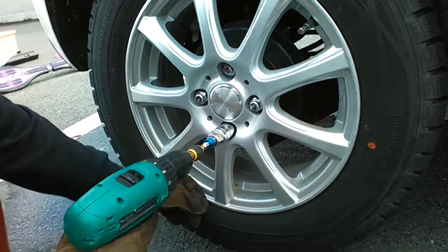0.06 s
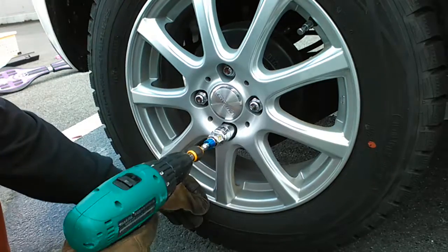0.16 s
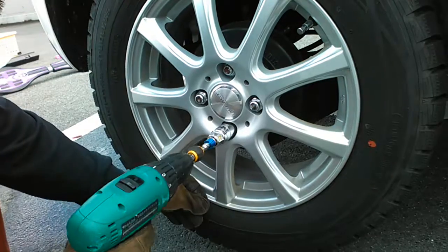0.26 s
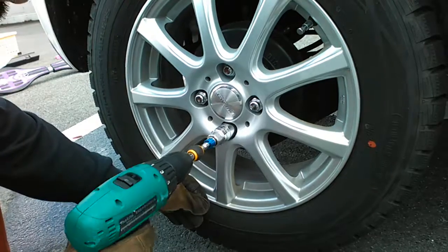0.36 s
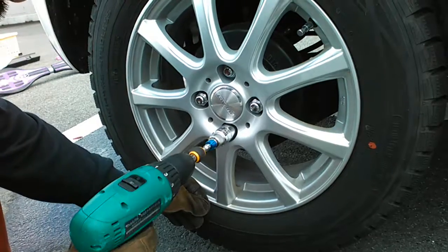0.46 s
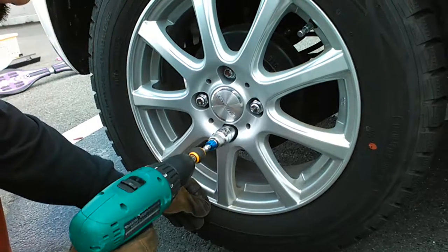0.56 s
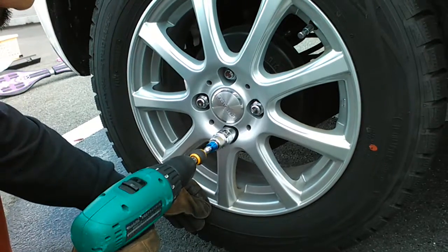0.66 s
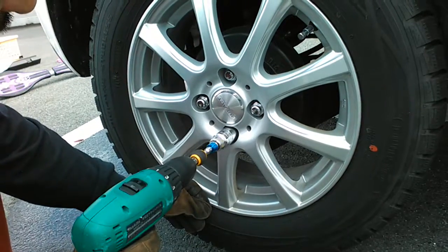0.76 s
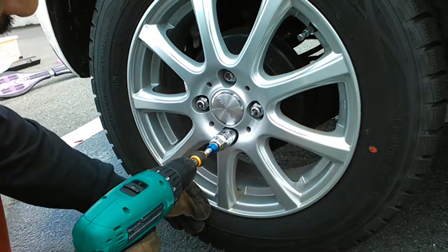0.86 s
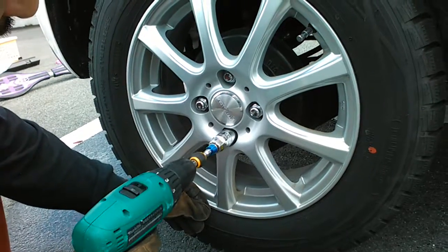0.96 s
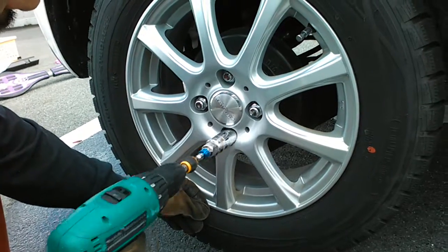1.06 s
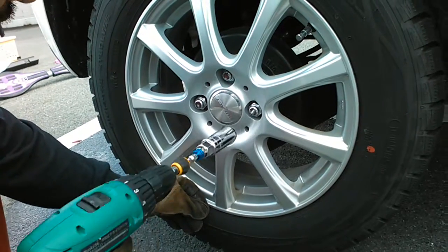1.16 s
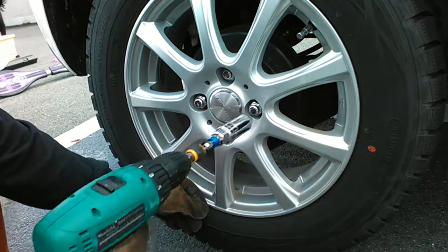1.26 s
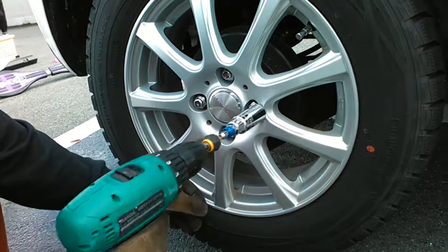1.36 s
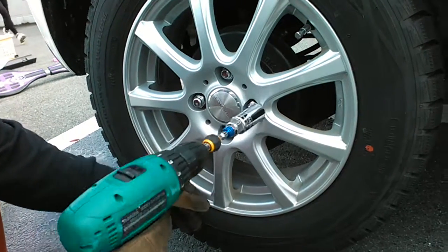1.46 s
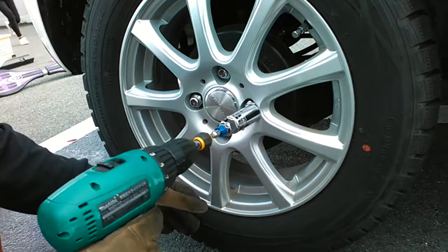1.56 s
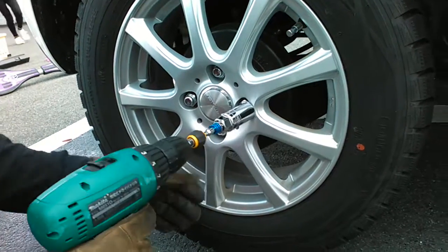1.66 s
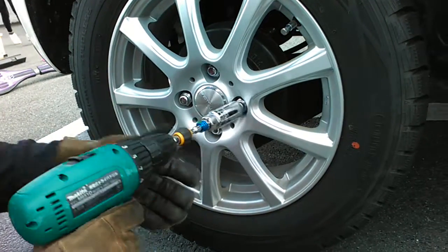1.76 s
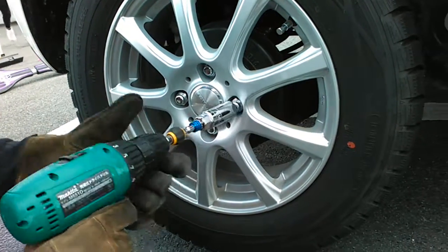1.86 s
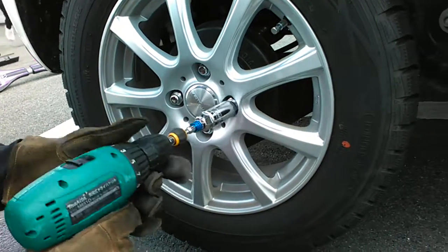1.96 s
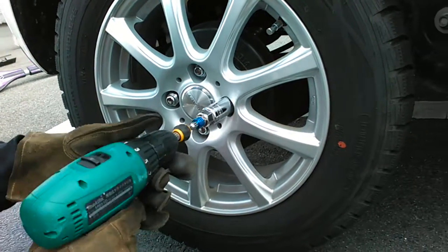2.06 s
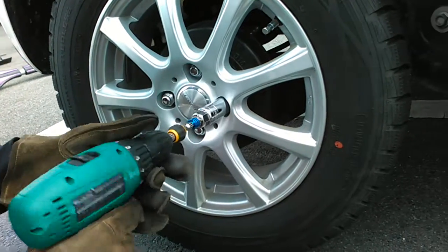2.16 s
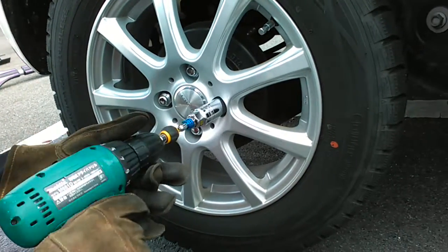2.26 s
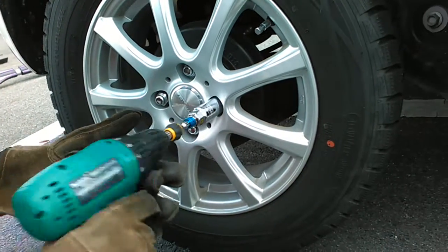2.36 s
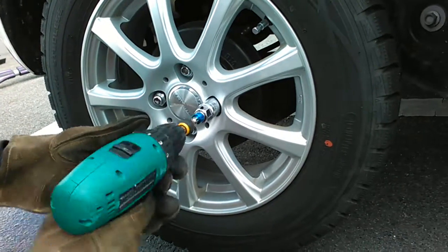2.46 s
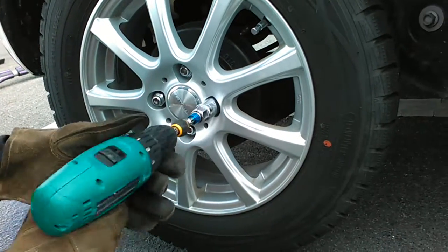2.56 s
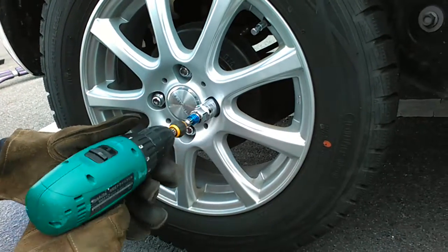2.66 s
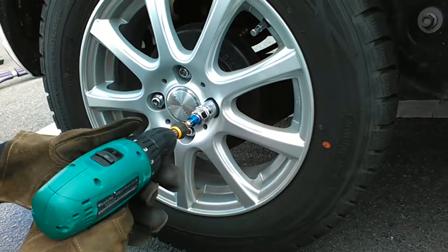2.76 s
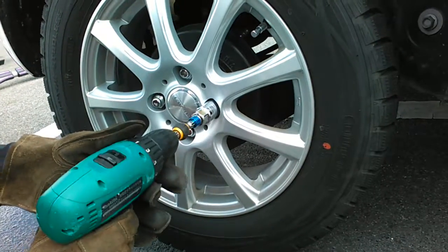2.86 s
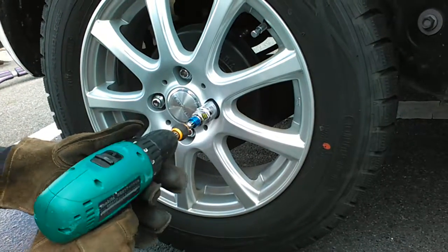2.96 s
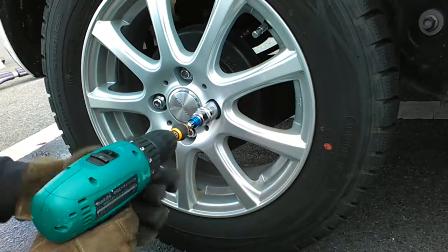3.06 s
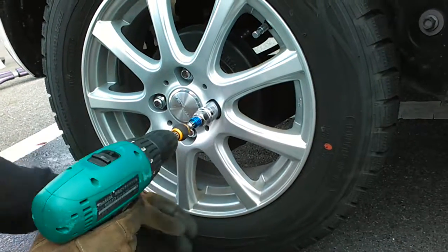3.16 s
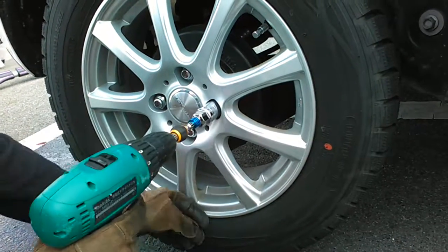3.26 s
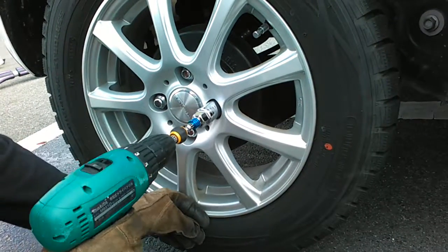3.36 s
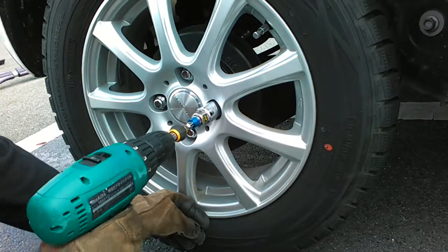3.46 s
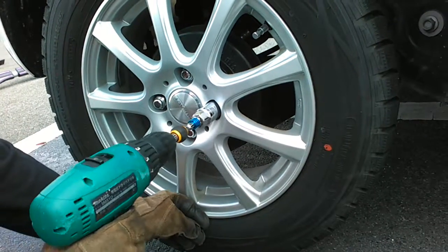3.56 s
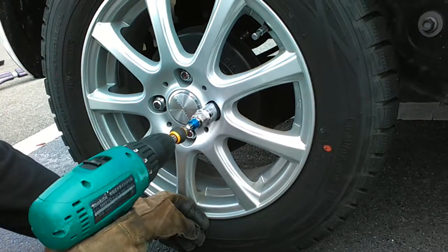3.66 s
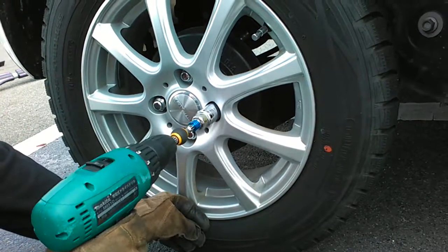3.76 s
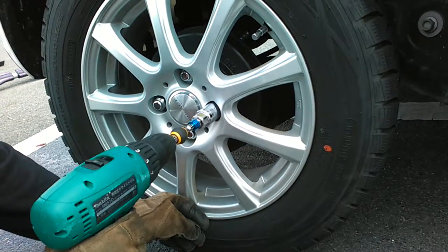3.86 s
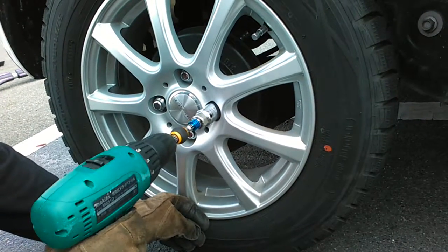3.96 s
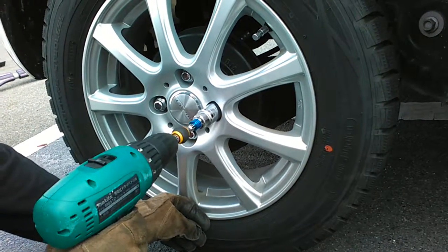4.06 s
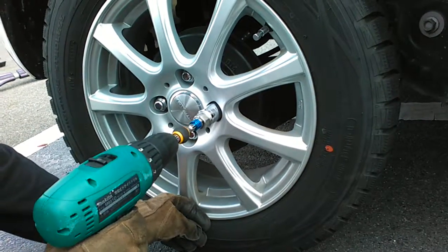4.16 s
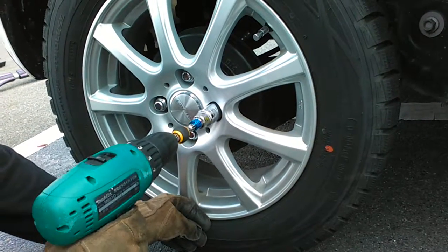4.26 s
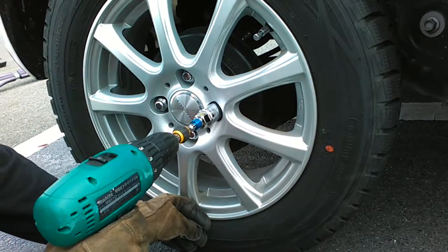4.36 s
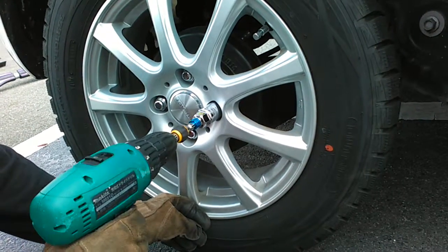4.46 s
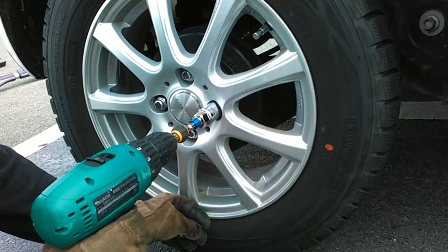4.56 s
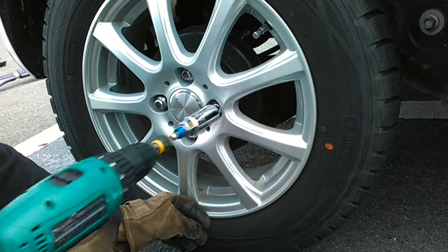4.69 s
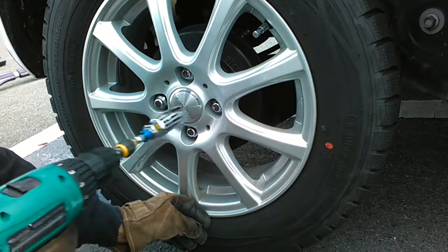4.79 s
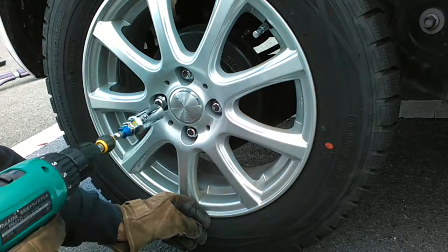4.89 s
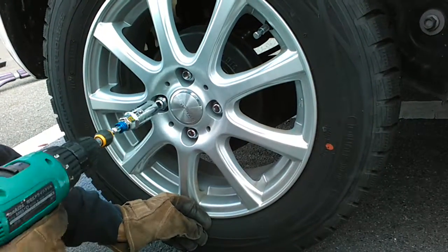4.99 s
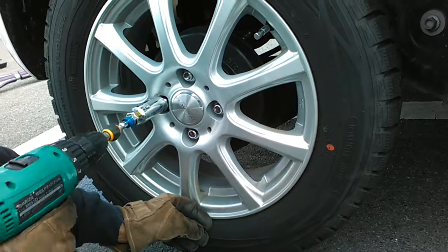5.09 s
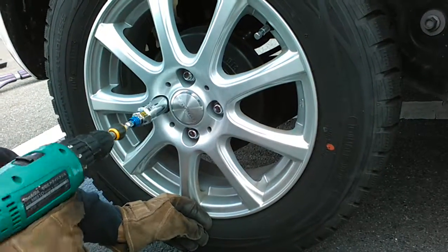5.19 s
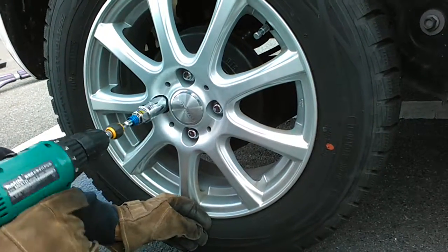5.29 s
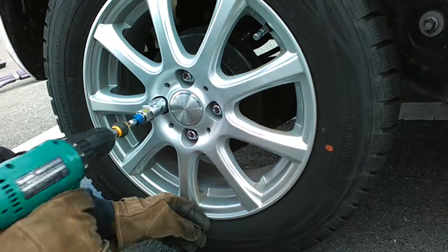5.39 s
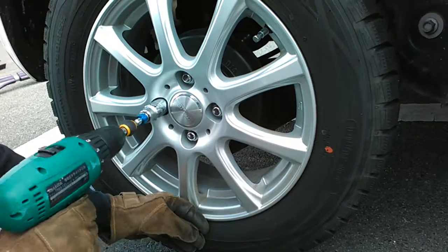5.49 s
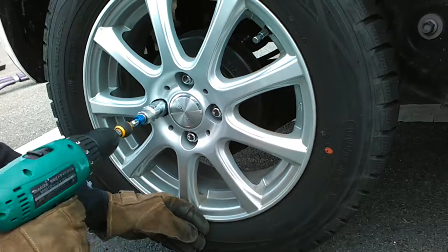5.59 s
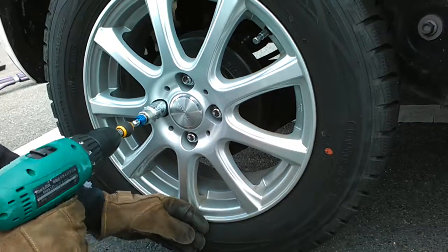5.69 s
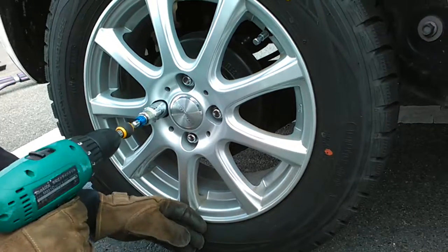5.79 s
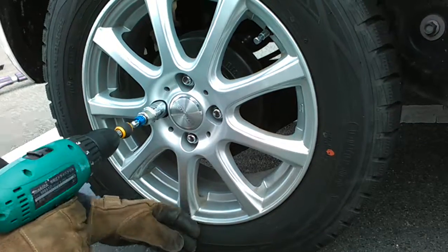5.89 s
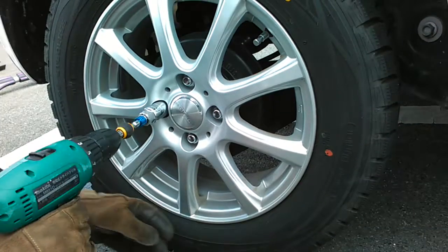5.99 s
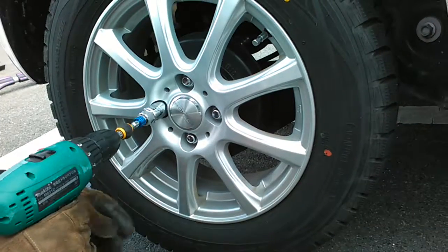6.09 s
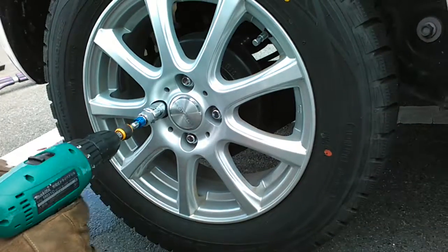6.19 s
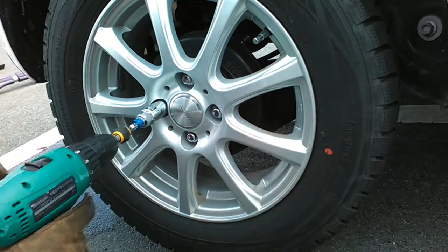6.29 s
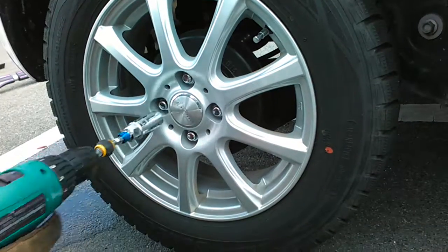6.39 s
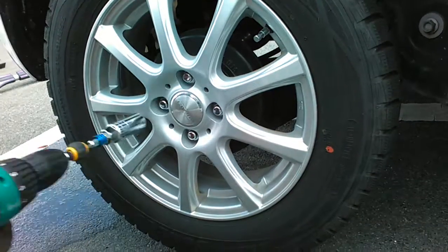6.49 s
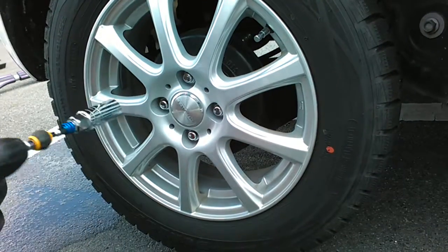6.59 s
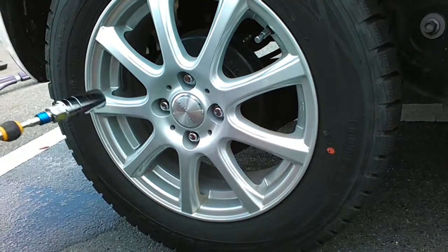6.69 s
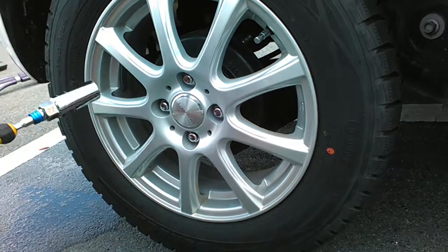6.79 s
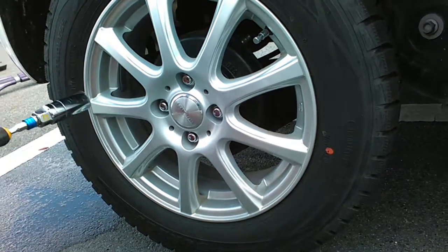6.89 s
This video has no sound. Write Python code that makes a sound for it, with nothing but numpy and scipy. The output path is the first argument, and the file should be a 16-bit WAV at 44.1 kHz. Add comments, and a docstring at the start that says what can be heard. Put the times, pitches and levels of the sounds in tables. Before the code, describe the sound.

Close, whirring bursts of a cordless driver tightening lug nuts, with ratcheting chatter and sharp metal clicks against a car wheel outdoors.

```python
"""A cordless driver whines and rattles close by, running four lug nuts onto an alloy car wheel.
Its motor and gears make the whine and rattle; its clutch ratchets whenever a nut resists.
Between runs the steel socket knocks on the wheel, scrapes over the next nut and rings when
pulled free. Gloves shift softly on the grip, and quiet outdoor air lies behind it all."""
import sys
import numpy as np
from scipy import signal
from scipy.fft import rfft, irfft
from scipy.io import wavfile
from scipy.ndimage import uniform_filter1d

SR = 44100
rng = np.random.default_rng(int(sys.argv[2]) if len(sys.argv) > 2 else 0)


def dump_mix(stems):
    """Bounce the given channels to the path in sys.argv[1] as a 16-bit WAV at rate SR."""
    frames = np.atleast_2d(stems).T  # one column per channel
    limited = np.clip(frames, -1, 1)  # hard clip at full scale
    pcm = np.round(limited * 32767).astype(np.int16)
    wavfile.write(sys.argv[1], SR, pcm)


N = 306054
T = np.arange(N) / SR

# The bright tone of small steel parts: pitch_hz, level_db
STEEL_COLOUR = [(1760, -25.5), (3000, -3), (3290, -13.5), (4050, -10), (4370, -13), (4950, -9.5),
                (5490, -16), (6260, -7.5), (8010, -7), (9240, -11), (12100, 4), (13700, 2), (14200, -17.5)]
# The tone of a light tick or scrape: pitch_hz, level_db
TICK_COLOUR = [(120, -55), (200, -11), (996, 3.5), (1300, -2.5), (1830, 4.5), (2180, -3), (2850, -2),
               (3170, -13.5), (3530, -9), (4220, -17), (5230, -13), (8470, -9.5), (9260, -16), (9940, -6),
               (14200, -17)]


def driver():
    """The motor spins up and coasts down; gears and ratcheting shake the housing; steel parts sizzle."""
    # Trigger pulls: start_s, release_s, coast_s, top_speed_hz, slowing_hz_per_s, gear_db, sizzle_db,
    # whine_db, whine_tilt_db_per_octave
    pulls = [(0.302, 1.03, 0.098, 348.2, 24, -47.5, -37.5, -46, -6.5),
             (2.602, 3.153, 0.096, 346.5, 0.5, -45, -39, -38.5, -1),
             (3.423, 4.644, 0.08, 348, 0, -43.5, -36.5, -41.5, -3.5),
             (5.461, 6.237, .13, 341.1, 3, -49.5, -40, -38.5, 4)]
    # Ratcheting bursts: the clutch slips on a resisting nut, or the socket rattles loosely as the nut
    # spins: start_s, ease_s, rise_s, fall_s, blows_hz, housing_db, sizzle_db,
    # grip (the blows' share of the housing sound, 0-1), wheel_db
    bursts = [(.82, 1.023, .012, 0.054, 129.2, -33.5, -29, .75, -60.5),
              (2.637, 2.975, 0.056, 0.15, 122.4, -32.5, -31.5, 0.82, -81),
              (3.472, 3.531, 0.011, 0.067, 104, -36.5, -33.5, 0.69, -86),
              (3.594, 3.643, 0.011, .07, 122.3, -33.5, -34.5, .88, -75),
              (3.741, 3.848, .02, .03, 67.83, -43, -54, 0.48, -69),
              (3.889, 4.303, .02, .04, 140, -42.5, -49.5, .5, -80.5),
              (4.346, 4.622, 0.0054, 0.056, 132, -33, -31.5, 0.86, -56),
              (5.991, 6.21, .007, 0.079, 128.1, -35, -31.5, 0.73, -61)]
    # The tone of the housing when a blow hits it: pitch_hz, level_db
    housing_colour = [(150, -37), (300, -33.5), (400, -18.5), (500, -2.5), (610, -2.5), (710, -17.5),
                      (880, -4), (1060, -6.5), (1280, -5), (1600, 3.5), (1950, 3.5), (2350, -2.5),
                      (2850, -1.5), (3300, -16.5), (4500, -11.5), (9000, -62)]
    start, release, coast, top_hz, drag, gear_db, steel_db, whine_db, tilt_db = columns(pulls)
    bite, ease, rise, fall, blows_hz, burst_db, burst_steel_db, grips, wheel_db = columns(bursts)
    spin_up_s, load_slowing = .066, .01
    spin = (1 - np.exp(-since(start) / spin_up_s)) * np.clip(1 - since(release) / coast, 0, 1)
    running = spin.sum(axis=0)
    load = (1 - np.exp(-since(bite) / rise)) * np.exp(-(since(ease) / fall) ** 2)
    load *= np.minimum(2 * running, 1)  # the ratcheting dies away below half speed
    burst_level = np.linalg.norm(undb(burst_db) * load, axis=0)
    housing_level = np.hypot(burst_level, (undb(gear_db) * spin ** 1.2).sum(axis=0))
    burst_sizzle = np.linalg.norm(undb(burst_steel_db) * load, axis=0)
    sizzle_level = np.hypot(burst_sizzle, (undb(steel_db) * spin ** 2.06).sum(axis=0))
    grip = np.clip(blend(load, grips) * burst_level / (housing_level + 1e-9), 0, .97)
    speed_hz = ((top_hz - drag * since(start)) * spin).sum(axis=0) * (1 - load_slowing * grip ** 2)
    turns = np.cumsum(speed_hz * (1 + .0011 * walk(60))) / SR
    blows, phase = ratchet(np.maximum(blend(load, blows_hz * load ** .38), 60), grip)
    # Parts shake in step with the motor, and harder just after each blow.
    shake = (1 + .1 * np.cos(2 * np.pi * turns)) * undb(.65 * walk(70))
    shake *= 1 + grip * np.exp(-phase / 1.1)
    gears = gear_rattle(shake)
    blows = blows + .3 * signal.fftconvolve(blows, tail(.022))[:N]  # quick echo off the wheel
    housing = np.sqrt(1 - grip) * gears + np.sqrt(grip) * steady(colour(blows, housing_colour))
    sizzle = steel_sizzle(shake, grip, phase)
    growl = gear_growl(turns, running, grip)
    whine = motor_whine(turns, spin, grip, whine_db, tilt_db)
    wheel = steady(cut(cut(blows, 210, "low", order=2), 90, "high"))
    wheel *= (undb(wheel_db) * load).sum(axis=0)
    return housing_level * housing + sizzle_level * sizzle + growl + whine + wheel


def ratchet(rate_hz, grip):
    """Blows with small rebounds: balls jump the clutch teeth, or a loose socket rattles unevenly."""
    wobble = (.005 + .1 * (1 - grip) ** 2) * walk(150)
    cycles = np.cumsum(rate_hz * (1 + wobble)) / SR
    blows = np.diff(np.floor(cycles), prepend=0) * undb(.56 * walk(300))
    rebound = np.diff(np.floor(cycles - .12 + .02 * walk(200)), prepend=-1).clip(0, 1)
    rebound *= undb(3 * walk(300))
    return unit(blows + .21 * rebound), cycles % 1


def gear_rattle(shake):
    """Thousands of tiny gear contacts a second ring the housing."""
    # The tone of the rattle: pitch_hz, level_db
    gear_colour = [(88, -42.5), (150, -34), (194, -4.5), (269, -21.5), (503, -12.5), (631, -6), (1060, -8),
                   (1420, 3), (1620, 0), (2180, 2.5), (2730, -6), (3290, -22.5), (3790, -14), (4070, -11.5),
                   (4500, -23.5), (5850, -41), (9900, -120)]
    return steady(colour(grains(7000, 1.6) * shake, gear_colour))


def steel_sizzle(shake, grip, phase):
    """Steel parts sizzle, more at each blow and again as the clutch balls land between teeth."""
    strikes = .25 * np.exp(-phase / .041) + .75 * np.exp(-((phase - .5) % 1) / .13)
    return steady(colour(grains(9000, .62) * shake * (1 + grip * strikes), STEEL_COLOUR))


def motor_whine(turns, spin, grip, whine_db, tilt_db):
    """The motor's spinning electrical contacts whine, standing out only near full speed."""
    # Tones of the whine: times_motor_speed, level_db
    whine_tones = [(12, -12), (15, -23), (18, -13), (21, -15), (27, -21), (30, -12), (33, -13), (36, -12),
                   (39, -10), (40, -14), (42, -9)]
    level = (undb(whine_db) * spin ** 6).sum(axis=0) * (1 - .36 * grip ** 2)
    return tones(whine_tones, turns, blend(spin, tilt_db)) * level


def gear_growl(turns, running, grip):
    """The gears growl, most of all a little below full speed."""
    # Tones of the growl: times_motor_speed, level_db
    growl_tones = [(3.11, -19), (4.15, -16), (6, -17), (6.22, -17), (8.3, -14)]
    level = undb(-43) * running ** 3 * (1 + 7 * (1 - running)) * (1 - grip)
    return tones(growl_tones, turns) * level


def socket_knocks():
    """The socket bumps the wheel: a short clack, a ring of the alloy and a steel tick."""
    # Bumps: start_s, wheel_db, tick_db, pitch_hz
    knocks = [(1.421, -42, -54, 1430), (2.02, -42, -55.5, 1435), (2.119, -52, -67, 1800),
              (2.463, -33.5, -48, 1780), (2.568, -56, -65.5, 1128), (5.111, -39, -55, 1810),
              (5.448, -34.5, -41, 1455)]
    # The tone of the clack: pitch_hz, level_db
    clack_colour = [(88, -50), (150, -13.5), (395, -16), (864, -10), (1530, 6), (1890, -15.5), (2150, -7.5),
                    (2440, -15.5), (2940, 2.5), (3390, -20), (3790, -9.5), (4130, -36), (4500, -11),
                    (5850, -49), (9900, -120)]
    # The wheel's ringing notes: pitch_hz, level_db, fade_s
    wheel_notes = [(428, -26, 0.45), (984, -4.5, 0.11), (1144, -14, .35), (1500, -3.5, .12),
                   (1596, -6.5, 0.29), (1740, -6, .13), (1880, 14, .03), (2130, -8.5, 0.12),
                   (3000, -8, .17)]
    out, t = np.zeros(N), T[:12000]
    for start_s, wheel_db, tick_db, pitch_hz in knocks:
        clack = colour(contact(.08), clack_colour)
        clack += .5 * signal.lfilter(*signal.iirpeak(pitch_hz, 2.5, fs=SR), clack)
        ring = sum(undb(db + 2 * rng.standard_normal()) * np.sin(2 * np.pi * hz * t) * fade(t, fade_s)
                   for hz, db, fade_s in wheel_notes)
        tick = cut(colour(contact(.16), TICK_COLOUR), 3000, "high")
        add(out, start_s, strength(clack, wheel_db) + strength(ring, wheel_db - 2.5)
            + strength(tick, tick_db))
    return out


def socket_ticks():
    """The loose socket rattles and scrapes over the nut's corners, and snaps hard as it catches."""
    # Ticks and scrapes: start_s, low_part_db, high_part_db, fade_s
    ticks = [(.015, -61.5, -77, 0.2), (.309, -59.5, -64, 0.087), (1.094, -44.5, -44.5, 0.022),
             (1.123, -51.5, -68, 0.051), (1.579, -61.5, -73, 0.089), (1.7, -77, -54.5, 0.066),
             (1.83, -58.5, -62.5, .035), (1.947, -58, -80, 0.093), (2.076, -46, -44, 0.079),
             (2.101, -53, -48, 0.089), (2.118, -48.5, -47, 0.08), (2.259, -64, -61, 0.2),
             (2.27, -54, -48.5, 0.073), (3.203, -56, -49, 0.038), (3.416, -65, -60, .05),
             (3.438, -50, -54.5, 0.051), (4.709, -50.5, -49.5, 0.028), (5.133, -56, -55, .05),
             (5.152, -56, -44.5, 0.16), (5.196, -48, -43, 0.13), (5.305, -57, -49.5, 0.23),
             (5.412, -59, -54, 0.069), (6.379, -51, -41, 0.052), (6.433, -62.5, -59, .03),
             (6.731, -60.5, -63, 0.033)]
    # Snaps onto a nut: start_s, peak_db
    catches = [(0.604, -24), (2.118, -30.5), (2.645, -27.5), (3.486, -26.5), (4.29, -16), (4.347, -19.5),
               (5.201, -29.5), (5.413, -33.5), (5.991, -15)]
    out, rise_s = np.zeros(N), .002
    for start_s, low_db, high_db, fade_s in ticks:
        tick = colour(contact(fade_s) * (1 - np.exp(-T[:12000] / rise_s)), TICK_COLOUR)
        add(out, start_s, strength(cut(tick, 4350, "low"), low_db))
        add(out, start_s, strength(cut(tick, 3140, "high"), high_db))
    for start_s, peak_db in catches:
        snap = colour(rng.standard_normal(1000) * fade(T[:1000], fade_s=.026), STEEL_COLOUR)
        add(out, start_s, snap / np.abs(snap).max() * undb(peak_db))
    return out


def socket_ring():
    """The steel tube rings on two close, high notes until it touches something."""
    # Rings: start_s, level_db, free_for_s
    rings = [(1.1, -51.5, .32), (2.02, -59, .06), (4.69, -49.5, 0.13), (4.746, -55.5, 0.37),
             (5.17, -54, .025), (5.196, -34, 0.0048), (5.309, -47, .015), (6.381, -65, 0.45)]
    pitch_hz, beat_hz = 9249, 12.5
    out, t = np.zeros(N), T[:SR]
    pair = np.sin(2 * np.pi * pitch_hz * t) + .53 * np.sin(2 * np.pi * (pitch_hz + beat_hz) * t)
    for start_s, db, free_s in rings:
        muffle = fade(np.maximum(t - free_s, 0), .034)
        add(out, start_s, undb(db) * pair * fade(t, fade_s=.92) * muffle)
    return out


def gloves():
    """Leather shifts on the grip with soft thuds and a faint rustle."""
    # Hand movements: start_s, thud_db, rustle_db, fade_s
    moves = [(0.112, -50.5, -67.5, 0.52), (2.3, -64.5, -67.5, 0.75), (4.893, -60, -97.5, .45)]
    # The dull tone of a thud: pitch_hz, level_db
    thud_colour = [(20, -36), (40, -3), (150, 0), (250, -12), (450, -13), (900, -32.5), (2000, -65)]
    start, thud_db, rustle_db, fade_s = columns(moves)
    shift = (1 - np.exp(-since(start) / .0041)) * np.exp(-np.log(1000) * since(start) / fade_s)
    thud = unit(colour(grains(400, 1.1), thud_colour)) * undb(thud_db)
    rustle = unit(colour(grains(3600, 3), TICK_COLOUR)) * undb(rustle_db)
    return ((thud + rustle) * shift).sum(axis=0)


def scatter(x):
    """Spokes and bodywork scatter the treble: a hiss that follows the level of the direct treble."""
    power = np.maximum(uniform_filter1d(cut(x, 4000, "high") ** 2, size=60), 0)
    hiss = unit(colour(rng.standard_normal(N), STEEL_COLOUR))
    return cut(np.sqrt(power) * hiss, 5100, "high", order=12)


def outdoors():
    """Quiet open air with a faint distant hum."""
    # The tone of the air: pitch_hz, level_db
    air_colour = [(15, -40), (25, -25), (45, -3), (80, 7.5), (160, 4), (300, -8.5), (500, -5.5),
                  (1000, -11.5), (2100, -14.5), (4000, -19.5), (8000, -23), (12500, -15.5), (14200, -28)]
    sway_db = .8 * walk(4)
    air = unit(colour(rng.standard_normal(N), air_colour))
    hum = np.sin(2 * np.pi * 360.7 * T)
    return undb(-71 + sway_db) * air + undb(-97 + sway_db) * hum


def tones(table, turns, tilt_db=0):
    """Wavering tones at multiples of the motor speed; a positive tilt favours the high ones."""
    middle = np.median([k for k, _ in table])
    return sum(undb(db + tilt_db * np.log2(k / middle) + 1.8 * walk(22))
               * np.sin(2 * np.pi * k * turns + .3 * walk(120)) for k, db in table)


def contact(fade_s, size=12000):
    """A sharp first touch, then a dying chatter of tiny hits."""
    shape = fade(T[:size], fade_s) + 5.2 * fade(T[:size], .0035)
    return rng.standard_normal(size) * shape * np.exp(.58 * rng.standard_normal(size))


def grains(per_s, spread_db):
    """Tiny random clicks of differing size."""
    clicks = (rng.random(N) < per_s / SR) * rng.standard_normal(N)
    return unit(clicks * undb(spread_db * np.minimum(rng.exponential(size=N), 4)))


def tail(fade_s, size=16000):
    """Dense, dying echoes."""
    echoes = rng.standard_normal(size) * fade(T[:size], fade_s)
    return echoes / np.linalg.norm(echoes)


def colour(x, points):
    """Shape the tone along a curve of (pitch_hz, level_db) points."""
    hz, db = np.transpose(points)
    grid = np.fft.rfftfreq(4096, 1 / SR) + 1
    cepstrum = irfft(np.log(undb(np.interp(np.log(grid), np.log(hz), db))))
    # This fold makes the filter ring after a hit, never before it.
    half = len(cepstrum) // 2
    cepstrum[1:half] *= 2
    cepstrum[half + 1:] = 0
    return signal.fftconvolve(x, irfft(np.exp(rfft(cepstrum))))[:len(x)]


def cut(x, hz, keep, order=4):
    """Keep the "low" or "high" side of a pitch."""
    return signal.sosfilt(signal.butter(order, hz, keep, fs=SR, output="sos"), x)


def walk(rate_hz):
    """A smooth random wander, about 1 in size."""
    knots = rng.standard_normal(N // 20)
    return unit(uniform_filter1d(np.interp(T * rate_hz, np.arange(len(knots)), knots), size=40))


def fade(t, fade_s):
    """Die away by 60 dB in fade_s seconds."""
    return np.exp(-np.log(1000) * t / fade_s)


def steady(x):
    """Even out the level over about a tenth of a second."""
    power = np.maximum(uniform_filter1d(x ** 2, size=4000), 0)
    return x / np.sqrt(power + 1e-4 * np.mean(x ** 2))


def strength(x, db):
    """Set the level of the first 10 ms."""
    return x * undb(db) / np.sqrt(np.mean(x[:440] ** 2))


def undb(db):
    """Decibels to gain."""
    return 10 ** (np.asarray(db) / 20)


def unit(x):
    """Scale to an average (rms) level of 1."""
    return x / np.sqrt(np.mean(x ** 2) + 1e-20)


def add(out, start_s, x):
    """Mix a sound in at its start time."""
    i = int(start_s * SR)
    out[i:i + len(x)] += x[:N - i]


def columns(table):
    """Split a table into columns, one row per event."""
    return np.transpose(table)[:, :, None]


def since(start_s):
    """Seconds since the start, zero before it."""
    return np.maximum(T - start_s, 0)


def blend(weights, values):
    """At each moment, average the values of the events that are sounding."""
    return (weights * values).sum(axis=0) / (weights.sum(axis=0) + 1e-12)


def scene():
    """Car body and asphalt add a short echo; only the treble differs between left and right."""
    near = driver() + socket_knocks() + socket_ticks() + gloves()
    echo = signal.fftconvolve(cut(near, 7000, "low", order=1), tail(.18))[:N]
    mid = near + undb(-11) * echo + outdoors()
    side = undb(-5.8) * scatter(mid)
    return socket_ring() + np.array([mid + side, mid - side])


def record(dry):
    """Thin the deep bass and cut the highest treble steeply."""
    treble_cut = signal.ellip(12, .2, 80, 14300, fs=SR, output="sos")
    return signal.sosfilt(treble_cut, cut(dry, 38, "high", order=2))


dry = scene()
out = record(dry)
dump_mix(out)
```